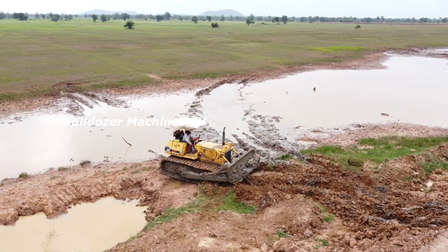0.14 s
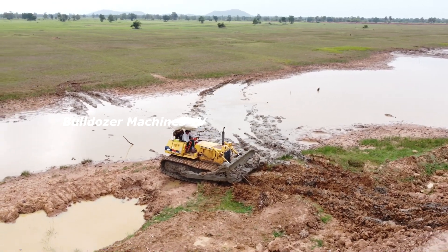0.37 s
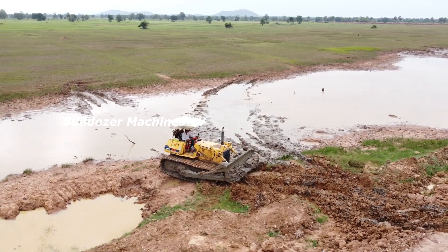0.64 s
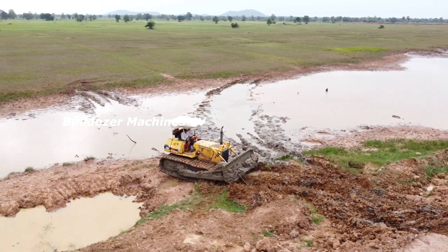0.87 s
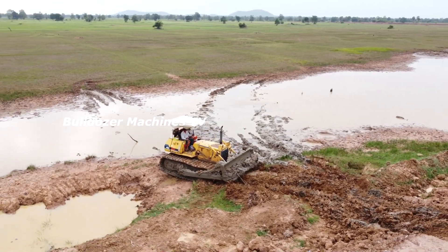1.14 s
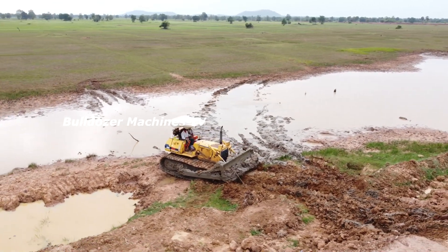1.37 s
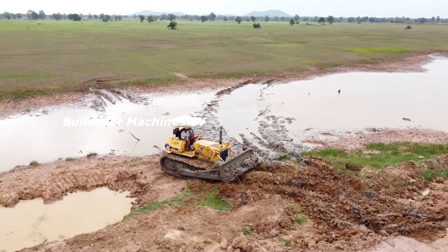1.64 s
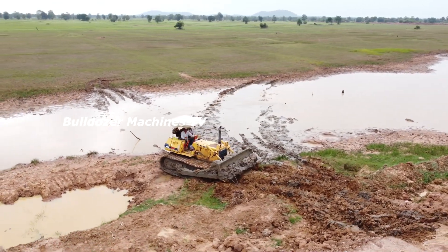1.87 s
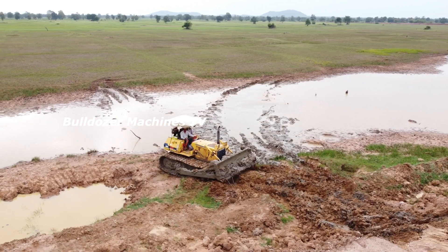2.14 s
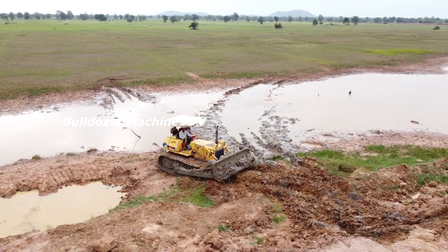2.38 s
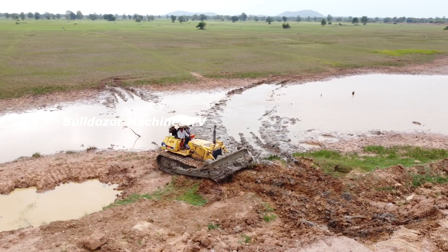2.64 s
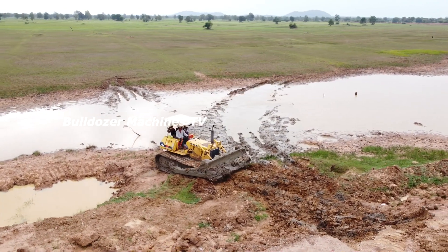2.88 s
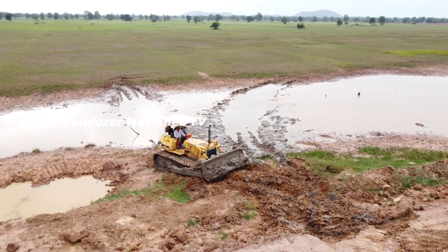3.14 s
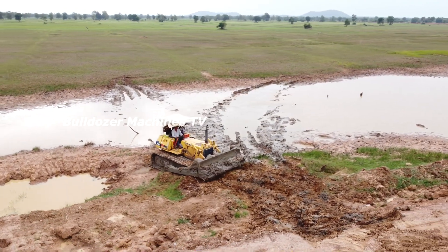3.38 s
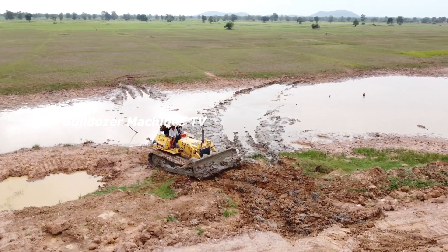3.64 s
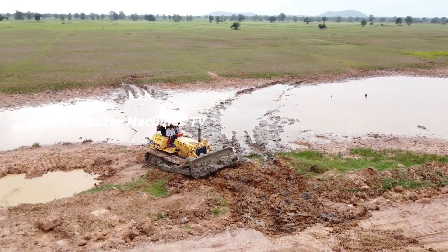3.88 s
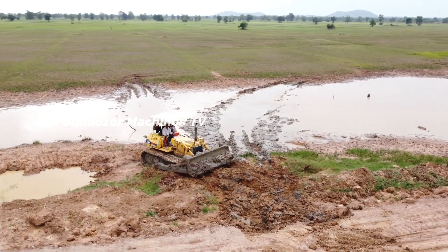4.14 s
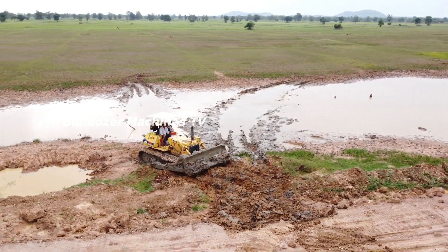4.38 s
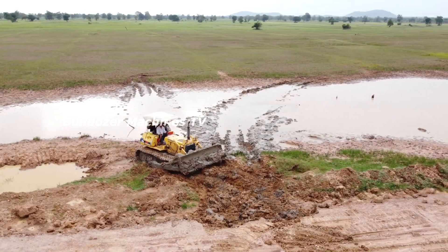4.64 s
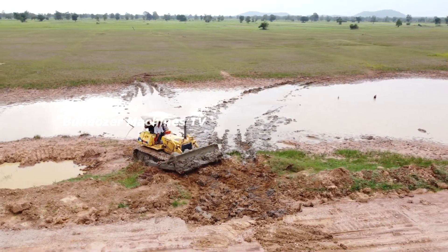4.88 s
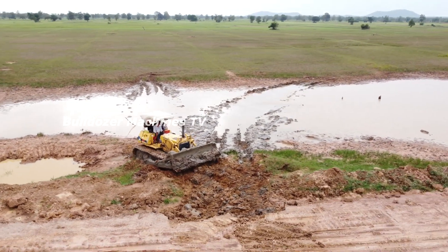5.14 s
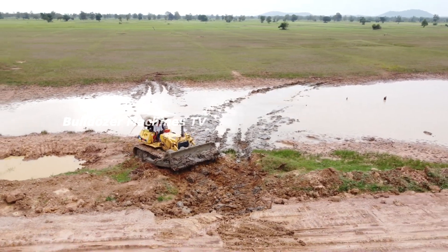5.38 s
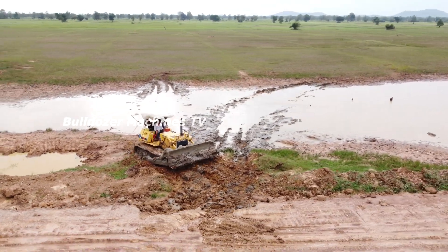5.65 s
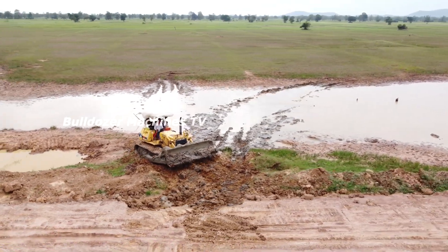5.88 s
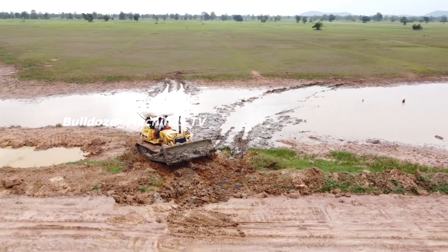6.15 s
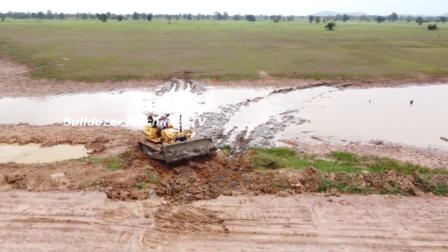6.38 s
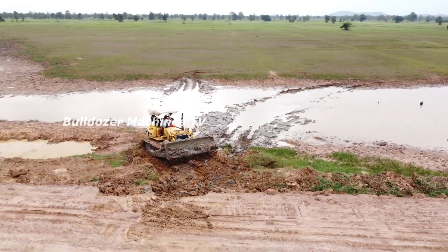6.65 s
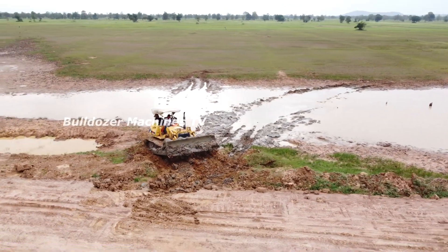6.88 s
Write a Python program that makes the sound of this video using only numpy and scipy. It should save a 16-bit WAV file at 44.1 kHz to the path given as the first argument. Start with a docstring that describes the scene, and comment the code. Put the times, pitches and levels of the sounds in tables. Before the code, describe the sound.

Close to a small crawler bulldozer in an open field, a six-cylinder diesel drones steadily with exhaust rumble, fan hum and rushing air. Early on, earth scrapes and a few dull knocks come from the tracks. The roar thickens and hoarse gear whine swells as load grows. At mid-point the sound stops abruptly for a fifth of a second, fades back and revs slightly higher, with a thin whistle near the end. Close stereo.

```python
"""First heard is the drone of a six-cylinder diesel under load, with its fan hum and hoarse gear whine:
a small crawler bulldozer pushing earth in open fields, close to two microphones. Running sines make
the tones; shaped noise makes the roar, the scraping earth and the insects pulsing in the grass;
decaying sines make the knocks. The sound is cut off once and fades back in as the engine revs up."""
import sys
import numpy as np
from scipy import signal
from scipy.fft import rfft, irfft, next_fast_len
from scipy.io import wavfile
from scipy.ndimage import uniform_filter1d, map_coordinates

SR = 44100
rng = np.random.default_rng(int(sys.argv[2]) if len(sys.argv) > 2 else 0)


def invert_db(level):
    """Linear amplitude ratio for a level in decibels (20 dB per decade), elementwise."""
    return 10 ** (np.asarray(level, dtype=float) / 20)


def dump(signal):
    """Clip the signal to [-1, 1] and save it as 16-bit WAV at the path in sys.argv[1]."""
    limited = np.clip(np.atleast_2d(signal).T, -1, 1)
    pcm = np.round(limited * 32767).astype(np.int16)
    wavfile.write(sys.argv[1], SR, pcm)


N = 309582
TIME = np.arange(N) / SR
CYLINDERS = 6  # firings per four-stroke cycle
CUT_S = 4.5005  # the sound stops here

# Engine running: t/s, firing f/Hz, firing strength/dB, blade load (1 = full)
ENGINE_RUN = [(0, 94.9, -1.5, 0), (.4, 94.78, 1, 0.1), (.8, 95.2, -2, 0.21), (1.15, 94.23, -1, 0.15),
              (1.5, 94.4, .5, 0.67), (1.95, 93.6, 1, 0.61), (2.36, 93.14, 0, 0.75), (2.43, 93.9, 1, 0.53),
              (2.485, 93.6, 2, -.3), (2.54, 92.6, 0, 0.63), (3.1, 91.82, 0, 0.97), (3.3, 93.5, -1.5, 0.78),
              (3.7, 92.5, -1, 0.93), (4.1, 92.5, 0, 0.83), (4.45, 90.75, 2, 0.98), (4.7, 92.6, -7, 0.77),
              (4.89, 92.7, -8.5, 0.56), (4.95, 93.5, -3.5, 0.26), (5.08, 95.6, 0, 0.65),
              (5.24, 100.9, 2.5, 0.8), (5.4, 103.6, -5, 0.53), (5.72, 103.9, -4.5, 0.43),
              (6.15, 102.2, -4.5, 0.5), (6.7, 102.2, -4, 0.5), (7.0, 103.1, -6, 0.66)]
# Shaft and fan tones: multiple of the four-stroke cycle, then level/dB at light load, full load, revved
SHAFT_TONES = [(3.7, -58, -58, -58), (10, -50, -48, -52), (14, -56, -65, -60), (20, -64, -64, -68),
               (21.8, -61, -62, -56), (24, -66, -70, -54), (33, -54, -66, -66), (36, -53, -55, -66),
               (41, -57, -57, -62), (51.5, -60, -62, -75), (55.1, -53, -60, -75), (57, -67, -72, -61),
               (63, -75, -70, -65), (86, -56, -48.5, -65)]
# Firing overtone and the fan hum just under it take turns: t/s, overtone level/dB, fan level/dB
OVERTONE_AND_FAN = [(0, -48, -37), (.08, -39.5, -43), (.38, -41, -43.5), (.5, -43.5, -43),
                    (.75, -42.5, -43), (1.0, -45.5, -42), (1.25, -48, -40), (1.45, -46, -39),
                    (1.8, -43, -41.5), (2.0, -37.5, -40.5), (2.38, -35.5, -46), (2.47, -43, -46),
                    (2.6, -38, -44), (2.8, -43, -43), (3.1, -42, -40), (3.38, -44, -40.5), (3.47, -36, -42),
                    (4.12, -37.5, -43), (4.22, -46.5, -42.5), (4.45, -37.5, -42.5), (4.8, -49, -47),
                    (5.06, -40, -38), (5.25, -41, -41), (5.5, -44, -40), (5.8, -41.5, -40),
                    (6.15, -46.5, -40), (6.4, -43.5, -42), (6.7, -40, -40), (7.02, -44, -41)]

# Swells of the gear whine: t/s of the peak, peak level/dB, length/s
WHINE_SWELLS = [(0.475, -39, 0.032), (0.68, -47, 0.1), (0.81, -41.5, 0.11), (1.21, -52, 0.2),
                (1.667, -41, 0.05), (1.834, -39.5, .08), (1.95, -40, 0.13), (2.102, -38, 0.09),
                (2.38, -35.5, 0.079), (2.544, -35.5, 0.033), (2.627, -34.5, 0.053), (2.737, -36.5, 0.028),
                (2.89, -33.5, 0.077), (3.002, -37.5, 0.082), (3.102, -30, 0.063), (3.252, -39.5, 0.066),
                (3.347, -34.5, 0.057), (3.576, -30, .13), (3.752, -37, 0.075), (3.858, -30, .1),
                (3.973, -36.5, 0.055), (4.06, -31.5, .08), (4.155, -34.5, 0.059), (4.321, -35, 0.059),
                (4.458, -35, 0.099), (5.121, -42.5, 0.071), (5.208, -41, 0.041), (5.399, -40, 0.03996),
                (5.46, -39, 0.056), (5.549, -36.5, 0.089), (5.627, -42.5, 0.08), (5.73, -38, 0.073),
                (5.85, -34.5, 0.14), (6.001, -34.5, 0.13), (6.11, -42, 0.066), (6.204, -38, 0.036),
                (6.308, -36, 0.04), (6.46, -42, 0.07), (6.55, -42.5, .08), (6.689, -37.5, 0.053),
                (6.811, -39.5, 0.069), (6.9, -34.5, 0.09), (7.02, -36, 0.08)]
# Swells of a strand four orders above the whine: t/s of the peak, peak level/dB, length/s
STRAND_SWELLS = [(.2, -56, 0.18), (.62, -43, 0.19), (1.12, -48, 0.3), (1.35, -49, 0.12),
                 (1.92, -47.5, 0.11), (2.15, -41.5, 0.091), (2.38, -46, 0.18), (2.75, -43.5, 0.19),
                 (3.02, -42.5, 0.13), (3.33, -40.5, 0.16), (3.58, -43, 0.082), (3.85, -47, .15),
                 (4.15, -43, 0.11), (4.42, -48, 0.096), (5.5, -52.5, 0.15), (5.9, -47.5, 0.26),
                 (6.25, -50, 0.21), (6.7, -50.5, 0.16), (6.95, -51, 0.12)]
# Thin whistle from the machine: t/s of the peak, peak level/dB, length/s, f/Hz
WHISTLE_NOTES = [(5.724, -64, 0.036, 3010), (5.897, -61, 0.039, 2996), (5.961, -55, 0.039, 2940),
                 (6.035, -56, .045, 2935), (6.087, -54.5, 0.064, 2915), (6.142, -57, .06, 2924),
                 (6.203, -59, 0.057, 2990), (6.305, -58, 0.12, 2900), (6.523, -66, 0.12, 2988),
                 (6.98, -59, 0.15, 2940)]

# Noise colours, each: f/Hz, relative level/dB per Hz
# Exhaust rumble
EXHAUST_COLOUR = [(15, -60), (25, -37), (48, -19), (72, -17), (102, -9.5), (122, -7.5), (139, -11),
                  (165, -5), (195, -8), (225, -11), (268, -18.5), (348, -17), (480, -33.5), (620, -53.5),
                  (1060, -120)]
# Casing under load
CASING_LOADED_COLOUR = [(250, -54), (430, -16), (560, -9.5), (690, -4), (800, -8), (890, -10), (972, -14),
                        (1340, -10.5), (1600, -13.5), (2050, -16), (2380, -17.5), (2650, -18.5),
                        (2900, -23), (3100, -23), (3400, -25), (3650, -32.5), (6000, -47.5), (7800, -93),
                        (13200, -120)]
# Casing at higher speed
CASING_REVVED_COLOUR = [(250, -38), (430, -18.5), (500, -16), (545, -10.5), (700, -3.5), (825, -3),
                        (881, -14), (1190, -11.5), (1480, -9.5), (1820, -15.5), (2500, -16), (3000, -21),
                        (3150, -25), (3350, -26), (6000, -46), (7800, -82.5), (13200, -120)]
# Rushing cooling air
AIR_COLOUR = [(2060, -34), (3500, -13.5), (3660, -4), (4460, -6.5), (6250, -8.5), (8420, -9.5),
              (10300, -16), (13300, -16.5), (14000, -16.5), (15000, -14.5), (15450, -21), (15550, -60)]
# High fizz of the air when revved
FIZZ_COLOUR = [(8500, -40), (10000, -2), (11200, -2), (12500, -4), (14500, -29)]
# Earth against blade and tracks
EARTH_COLOUR = [(450, -30), (750, 15.5), (1000, -20), (1350, 6.5), (1700, -2), (2050, -11), (2400, -15),
                (2700, -12), (3400, -11.5), (4400, -14), (5200, -29), (7000, -43)]
# Insects in the grass
INSECT_COLOUR = [(5500, -58.5), (6800, -5.5), (7700, 0.5), (8500, -1.5), (9400, -5), (10500, -49)]

# Blade and tracks scraping through earth: t/s of the peak, peak level/dB, length/s
SCRAPES = [(.04, -56, .1), (.23, -39, 0.065), (.46, -41.5, 0.12), (.63, -45, 0.099), (.81, -56, 0.053),
           (.94, -44.5, 0.029)]
# Small knocks of track and stones: t/s, starting level/dB before panning, ring f/Hz, t60/s, left minus right/dB
TRACK_KNOCKS = [(.187, -31, 730, 0.034, -1), (0.325, -24.5, 232, 0.076, 0), (0.921, -42, 2750, 0.043, 4),
                (0.932, -45.5, 3200, 0.06, 1), (1.029, -40, 1490, 0.021, 26)]

# Likeness of the noise at the two microphones: f/Hz, correlation (1 = alike)
EAR_LIKENESS = [(35, 0.82), (80, 1), (330, 0.87), (770, 0.9), (1800, 0.68), (2800, 0.8), (4200, 0.3),
                (6400, 0.23), (10000, 0.13), (15000, 0.299)]
# Balance of the microphones: f/Hz, left minus right level/dB
MICROPHONE_LEAN = [(60, -3), (110, -2.5), (200, -2), (380, -2.0), (700, -2.5), (1290, -1.5), (2380, 1),
                   (4400, 0), (8120, -5.5), (15000, 1)]
# Return of the sound after the cut: t/s, gain level/dB
RETURN_FADE = [(4.684, -50), (4.688, -24), (4.719, -8.5), (4.8, -3.5), (4.92, 0), (5.0, 0)]


def unit(x):
    """Scaled to rms 1."""
    return x / np.sqrt(np.mean(x ** 2) + 1e-20)


def in_db(power):
    """Power as dB."""
    return 10 * np.log10(power + 1e-20)


def along(points, hz):
    """A (f/Hz, value) table read along a log frequency axis."""
    f, v = np.transpose(points)
    return np.interp(np.log(hz + 1), np.log(f + 1), v)


def curves(rows):
    """One value per sample for each column after the time."""
    s, *columns = np.transpose(rows)
    return [np.interp(TIME, s, column) for column in columns]


def wobble(rate):
    """A smooth random curve, rate knots a second."""
    knots = rng.standard_normal(int(N * rate / SR) + 4)
    return map_coordinates(knots, [TIME * rate])


def filtered(x, response):
    """x shaped by a complex response of frequency."""
    m = next_fast_len(N + 8192)
    spectrum = rfft(x, m) * response(np.fft.rfftfreq(m, 1 / SR))
    return irfft(spectrum, m)[..., :N]


def tone(turns, db):
    """A sine of rms level db along a running phase in turns."""
    return np.sqrt(2) * invert_db(db) * np.cos(2 * np.pi * turns)


def swells(rows):
    """Power of each swell: a slow rise, a quicker end, length its width at half power."""
    s, db, length = np.transpose(rows)[:, :, None]
    quick_end = .3  # share of the length after the peak
    flank = length * np.where(TIME > s, quick_end, 1 - quick_end)
    return invert_db(2 * db) * .5 ** (((TIME - s) / flank) ** 2)


def cycles():
    """Running count of four-stroke cycles."""
    return np.cumsum(curves(ENGINE_RUN)[0]) / SR / CYLINDERS


def revved():
    """0 at working speed, 1 when revved up, by firing rate."""
    from_hz, span_hz = 96, 6
    return np.clip((curves(ENGINE_RUN)[0] - from_hz) / span_hz, 0, 1)


def machine_noise(spectrum, repeat, patchy_db):
    """Stereo noise of rms 1: a share follows the crank turn, the rest is fresh and patchy."""
    z = signal.stft(rng.standard_normal((2, N)), nperseg=512)[2]
    field = rng.standard_normal(z.shape[1:])
    field = uniform_filter1d(field, size=6, axis=0)
    field = uniform_filter1d(field, size=12, axis=1)
    patchy = signal.istft(z * invert_db(patchy_db * unit(field)), nperseg=512)[1]
    pair = unit(patchy[:, :N])

    # the pattern over one crank turn drifts slowly from one shape to the next
    pattern = rng.standard_normal((12, 1400))
    place_in_turn = 2 * cycles() % 1 * 1400
    turn = map_coordinates(pattern, [TIME * 1.5, place_in_turn], order=1, mode="grid-wrap")
    share = np.clip(repeat, 0, 1)
    pair[0] = np.sqrt(1 - share) * pair[0] + np.sqrt(share) * unit(turn)

    def mid_side_response(hz):
        angle = np.arccos(np.clip(along(EAR_LIKENESS, hz), 0, 1)) / 2
        return invert_db(along(spectrum, hz)) * [np.cos(angle), np.sin(angle)]

    mid, side = filtered(pair, mid_side_response)
    return unit(np.array([mid + side, mid - side]))


def load_humps(x, delay_s, strength):
    """The roar with a delayed copy of itself: evenly spaced humps, clearer as strength grows."""
    return x + strength * filtered(x, lambda hz: np.exp(-2j * np.pi * hz * delay_s))


def insects():
    """A chorus in the grass: noise pulsing at an even rate whatever the engine does."""
    pulses_per_s, first_s, sharpness = 20.75, .019, 1.8
    pulse = np.cos(np.pi * pulses_per_s * (TIME - first_s)) ** 2
    chorus = unit(pulse ** sharpness * machine_noise(INSECT_COLOUR, repeat=0, patchy_db=2.5))
    return invert_db(-68.7 + 3.4 * wobble(2.61)) * chorus


def knocks():
    """Track and stones: short dull decaying rings, each from its own side."""
    sound = np.zeros((2, N))
    for s, db, ring_hz, t60, pan_db in TRACK_KNOCKS:
        t = np.maximum(TIME - s, 0)
        ring = invert_db(db - 60 * t / t60) * np.sin(2 * np.pi * ring_hz * t)
        sound += invert_db(np.array([[.5], [-.5]]) * pan_db) * ring
    return sound


def scrape():
    """Earth dragging past blade and tracks: gritty noise in uneven patches."""
    strength = np.sqrt(swells(SCRAPES).sum(axis=0))
    return strength * machine_noise(EARTH_COLOUR, repeat=0, patchy_db=1.5)


def whistle():
    """One wavering high sine that slides from note to note."""
    rows = np.array(WHISTLE_NOTES)
    pitch_hz = np.interp(TIME, rows[:, 0], rows[:, 3])
    turns = np.cumsum(pitch_hz) / SR + .07 * wobble(25)
    level_db = in_db(swells(rows[:, :3]).sum(axis=0)) + 1.6 * wobble(20)
    return tone(turns, level_db)


def exhaust_rumble():
    """Low exhaust noise with a slowly wavering level."""
    level_db = -37.5 + 0.97 * wobble(4.03) + 0.81 * wobble(12.0)
    return invert_db(level_db) * machine_noise(EXHAUST_COLOUR, repeat=0.1, patchy_db=1.0)


def casing_roar():
    """Casing noise that beats with the firings, grows under load and changes colour when revved."""
    load, fast_share = curves(ENGINE_RUN)[2], revved()
    loaded = machine_noise(CASING_LOADED_COLOUR, repeat=.2, patchy_db=1.8)
    loaded = load_humps(loaded, delay_s=.00145, strength=.14 + .24 * load)
    fast = machine_noise(CASING_REVVED_COLOUR, repeat=0.11, patchy_db=0.6)

    def band_levelled(x):
        """Scaled so that 900-3500 Hz has rms 1."""
        return x / np.std(filtered(x, lambda hz: (hz > 900) & (hz < 3500)))

    rattle = np.sqrt(1 - fast_share) * band_levelled(loaded) + np.sqrt(fast_share) * band_levelled(fast)
    rattle = rattle * (1 + .16 * np.cos(2 * np.pi * CYLINDERS * cycles()))
    level_db = -45 + 5 * load + 0.47 * wobble(4.15) + 0.29 * wobble(10.0)
    return invert_db(level_db) * rattle


def cooling_air():
    """Rushing air, louder with strong firing and after the cut; a high fizz joins when revved."""
    firing_db = curves(ENGINE_RUN)[1]
    hiss_db = -58 + 0.4886 * np.maximum(firing_db, 0) + 1 * (TIME > CUT_S)
    hiss_db = hiss_db + 0.37 * wobble(2.8) + 0.21 * wobble(20)
    hiss = invert_db(hiss_db) * machine_noise(AIR_COLOUR, repeat=0.026, patchy_db=1.2)
    fizz = invert_db(-69.5 + 1.5 * wobble(2)) * revved() * machine_noise(FIZZ_COLOUR, repeat=0, patchy_db=2)
    return hiss + fizz


def gear_whine():
    """Teeth meet unevenly: the note and its octave are hoarse, and each swell drags the pitch down."""
    gear_order = 43.97  # tooth meetings per four-stroke cycle
    sag_hz_per_s, sag_eased = 125, .95  # pitch fall at full load; share of it lost when revved
    octave_db, third_db = -14, -23.5  # relative to the whine's swells
    load, fast, cycle = curves(ENGINE_RUN)[2], revved(), cycles()
    power = swells(WHINE_SWELLS)
    total = power.sum(axis=0)
    rest = invert_db(2 * -54)  # power between swells

    s, _, length = np.transpose(WHINE_SWELLS)[:, :, None]
    # the power-weighted time since each swell began to rise
    into_swell_s = np.sum(power * (TIME - s + .42 * length), axis=0) / (total + rest)
    sag_hz = sag_hz_per_s * load * (1 - sag_eased * fast) * into_swell_s
    teeth = gear_order * cycle - np.cumsum(sag_hz) / SR + (.035 - 0.029 * fast) * wobble(30)

    note = tone(teeth, in_db(total + rest) + (1.6 - 1.1 * fast) * wobble(35))
    # the octave rests at -59.5 dB between swells, 6 dB higher when revved
    octave_level_db = in_db(invert_db(2 * octave_db) * total + invert_db(2 * (-59.5 + 6 * fast)))
    octave = tone(2 * teeth + .26 * wobble(75), octave_level_db + 3 * wobble(45))
    third_level_db = octave_level_db - octave_db + third_db
    third = tone(3 * teeth + .2 * wobble(60), third_level_db + 3 * wobble(30))
    strand_db = in_db(swells(STRAND_SWELLS).sum(axis=0)) + 1.5 * wobble(20)
    strand = tone(teeth + 4 * cycle + .1 * wobble(14), strand_db)
    return note + octave + third + strand


def engine_tones():
    """Sines locked to the four-stroke cycle: a steadier firing note; overtone, shafts and fan swell and sink."""
    _, firing_db, load = curves(ENGINE_RUN)
    cycle, fast = cycles(), revved()
    # note and overtone pull down together: broad crests, sharp troughs
    sound = -tone(CYLINDERS * cycle, -28.5 + firing_db + .5 * wobble(6.6))
    overtone_db, fan_db = curves(OVERTONE_AND_FAN) + .8 * wobble(12)
    sound -= tone(2 * CYLINDERS * cycle + .05 * wobble(12), overtone_db)
    fan_order = 10.9  # multiple of the four-stroke cycle
    sound += tone(fan_order * cycle + .05 * wobble(8), fan_db + 1.5 * wobble(6.3))
    for order, light_db, loaded_db, revved_db in SHAFT_TONES:
        working_db = light_db + load * (loaded_db - light_db)
        level_db = (1 - fast) * working_db + fast * revved_db + 2.75 * wobble(7)
        sound += tone(order * cycle + rng.random() + 0.0038 * order * wobble(8), level_db)
    return sound


def scene():
    """The field and all parts of the machine heard together."""
    field = insects() + knocks() + scrape()
    roar = exhaust_rumble() + casing_roar() + cooling_air()
    return field + whistle() + roar + gear_whine() + engine_tones()


def top_cut(x):
    """Nothing passes above the cut-off."""
    return signal.sosfilt(signal.butter(12, 15660, fs=SR, output="sos"), x)


def record(dry):
    """Two close microphones, the left slightly ahead; an abrupt cut, then a fade back in."""
    left_lead_s = 2e-5
    ears = np.array([[.5], [-.5]])

    def microphones(hz):
        return invert_db(ears * along(MICROPHONE_LEAN, hz)) * np.exp(2j * np.pi * hz * ears * left_lead_s)

    pair = filtered(dry, microphones)
    s, db = np.transpose(RETURN_FADE)
    before_cut = np.clip((CUT_S - TIME) / .0005 + .5, 0, 1)
    fade_in = invert_db(np.interp(TIME, s, db, left=-200))
    mix = pair * (before_cut + fade_in)
    return top_cut(mix)


dry = scene()
out = record(dry)
dump(out)
```